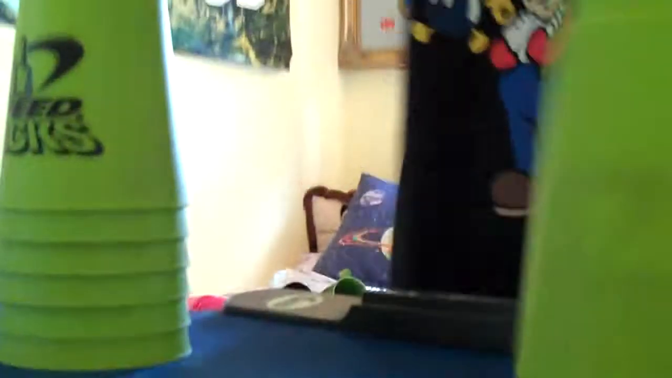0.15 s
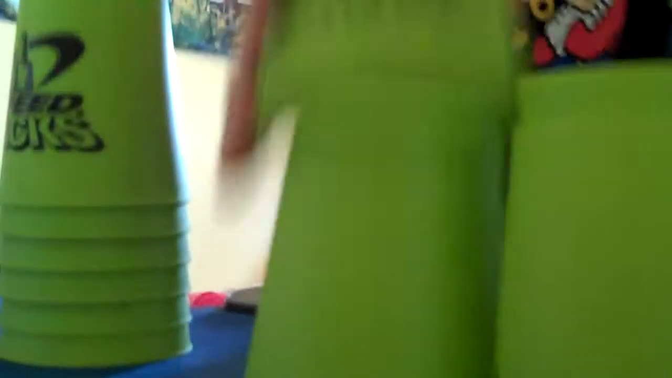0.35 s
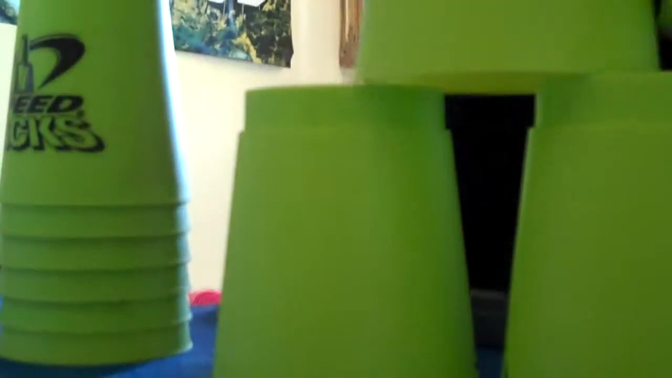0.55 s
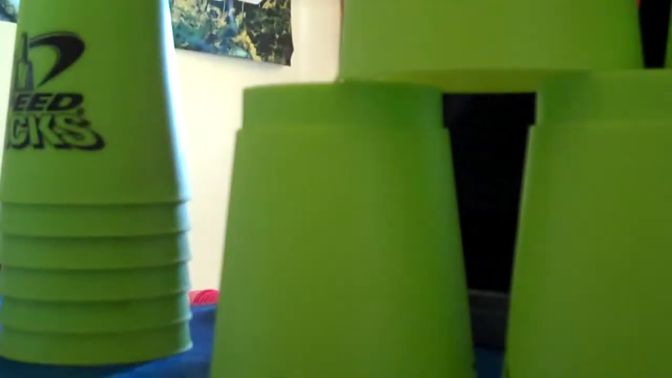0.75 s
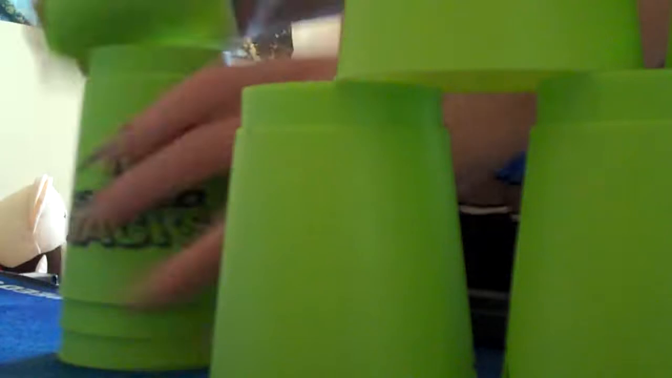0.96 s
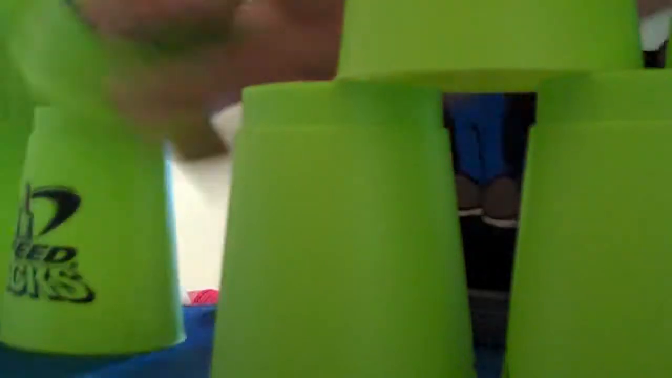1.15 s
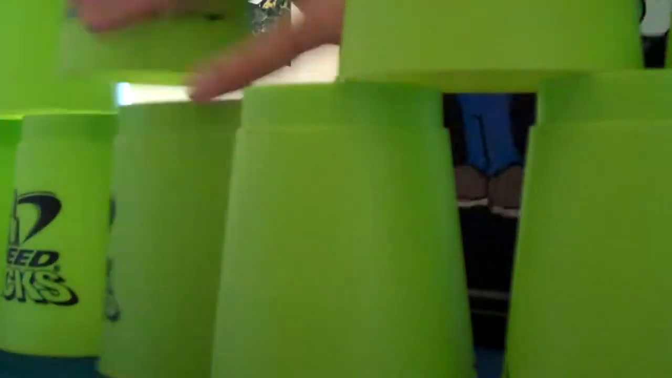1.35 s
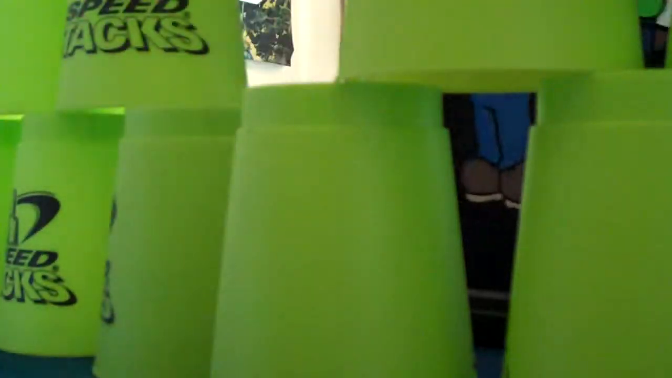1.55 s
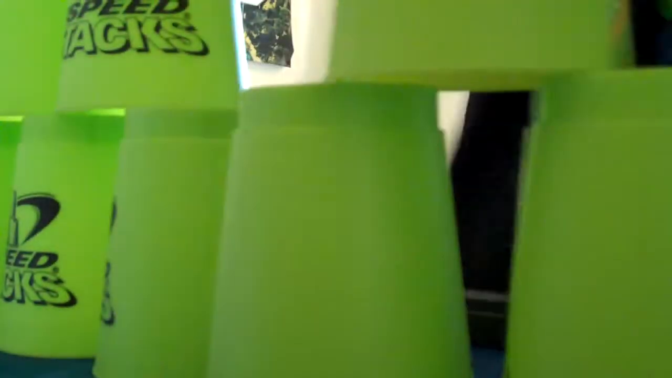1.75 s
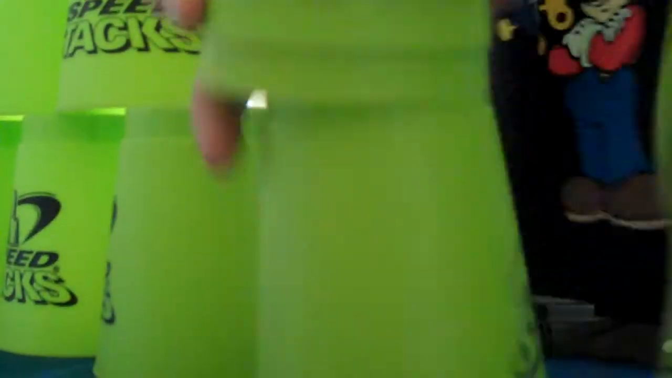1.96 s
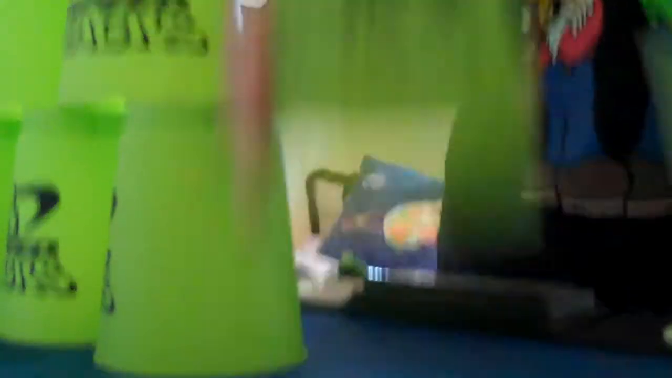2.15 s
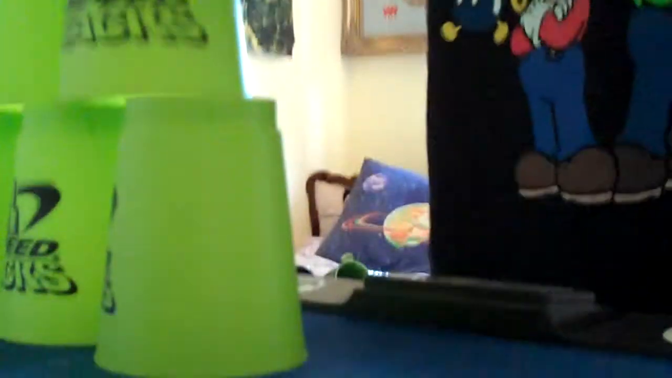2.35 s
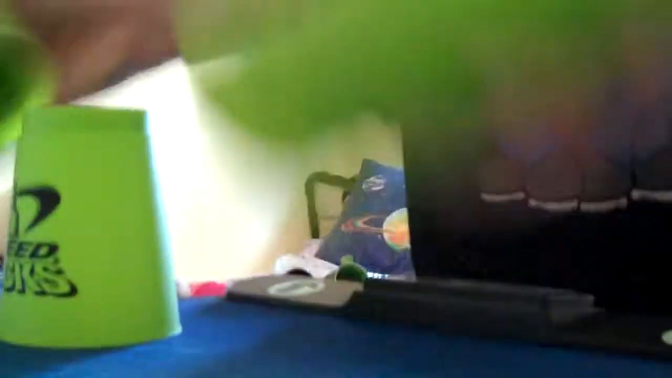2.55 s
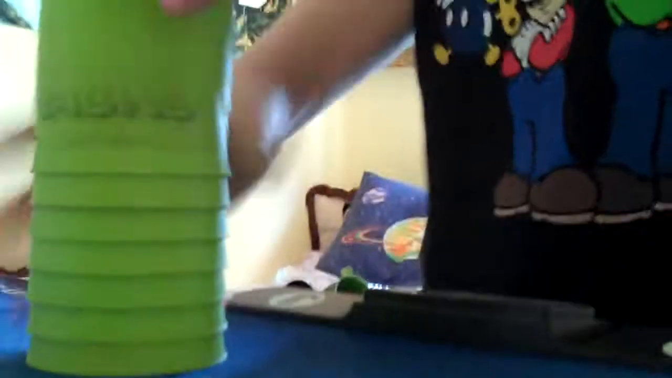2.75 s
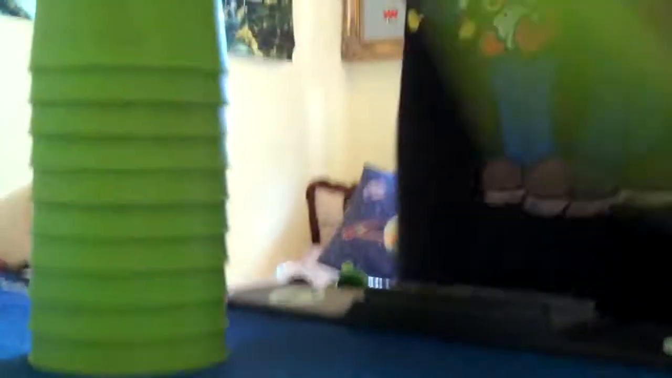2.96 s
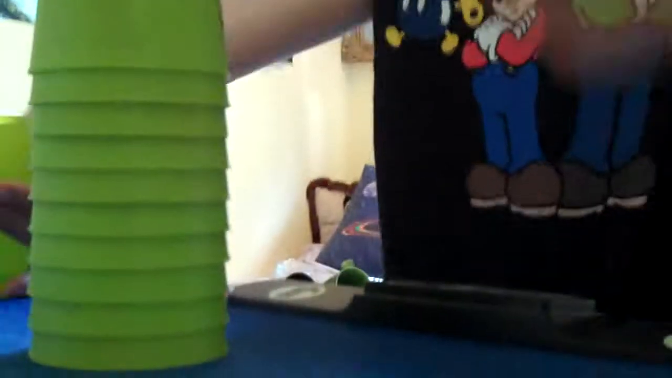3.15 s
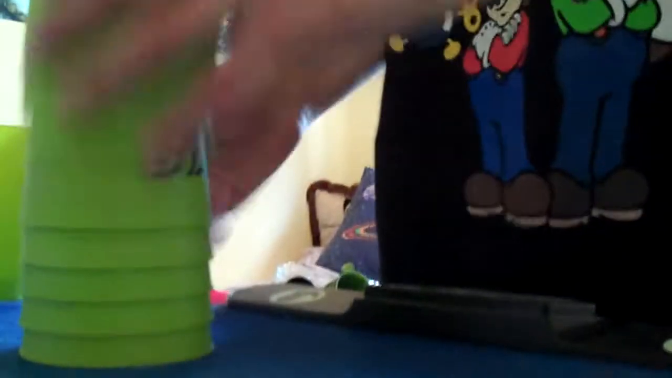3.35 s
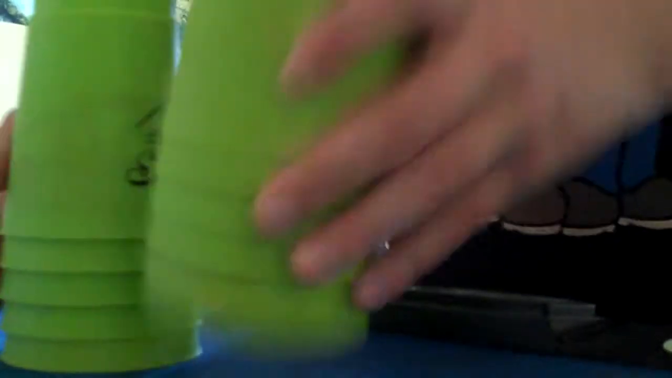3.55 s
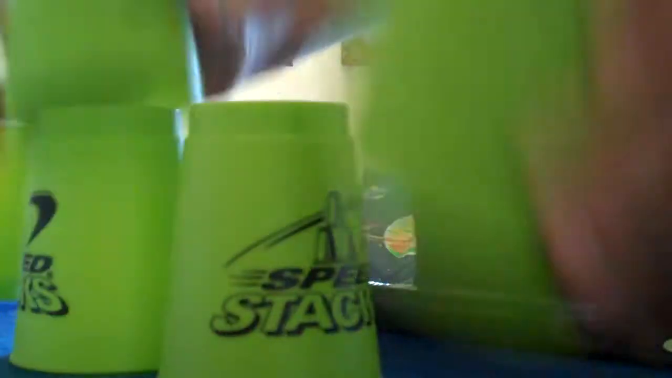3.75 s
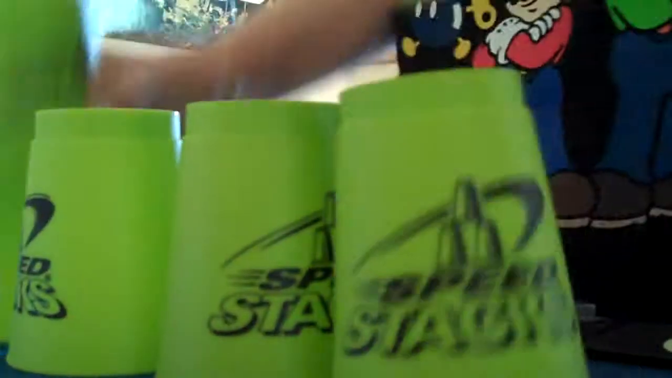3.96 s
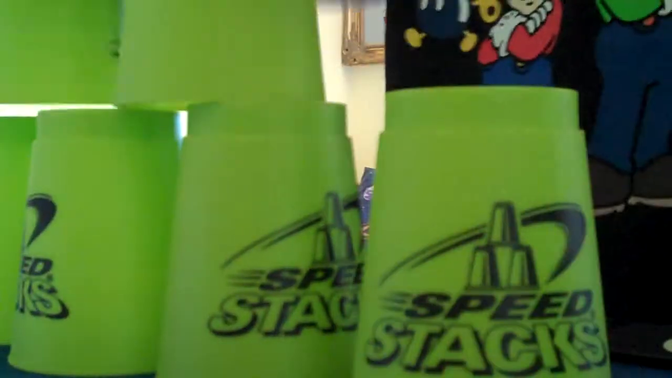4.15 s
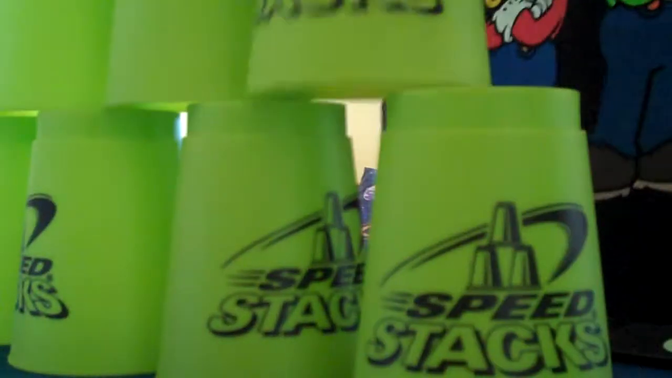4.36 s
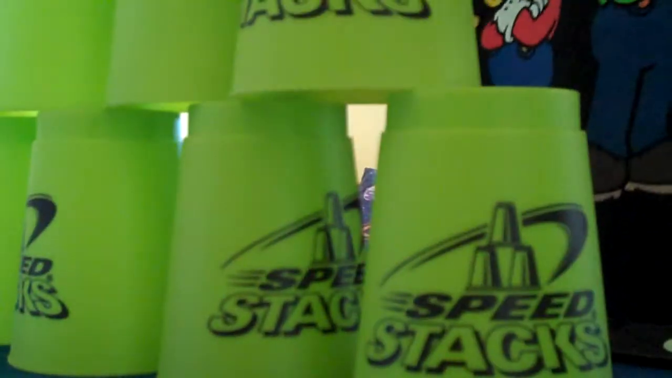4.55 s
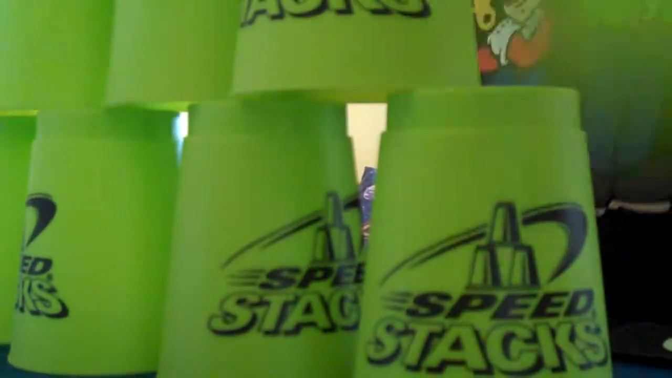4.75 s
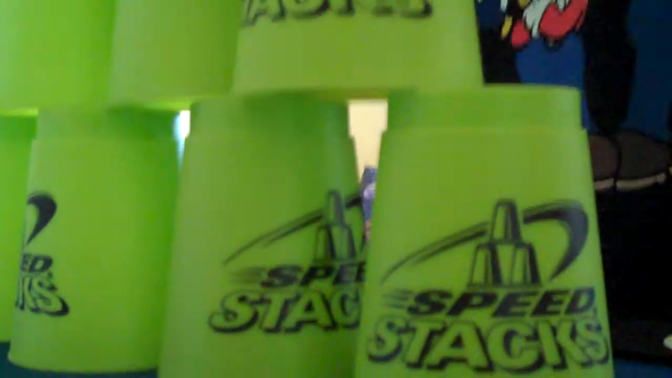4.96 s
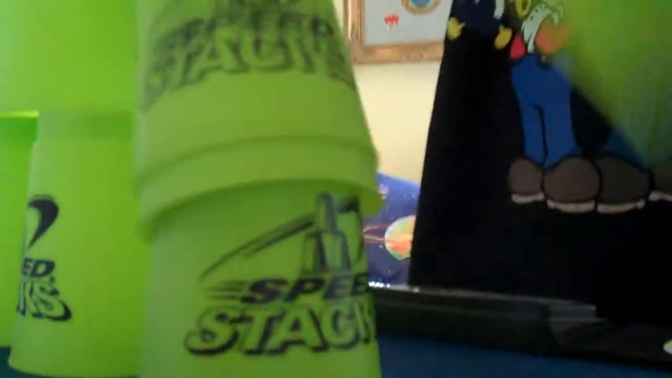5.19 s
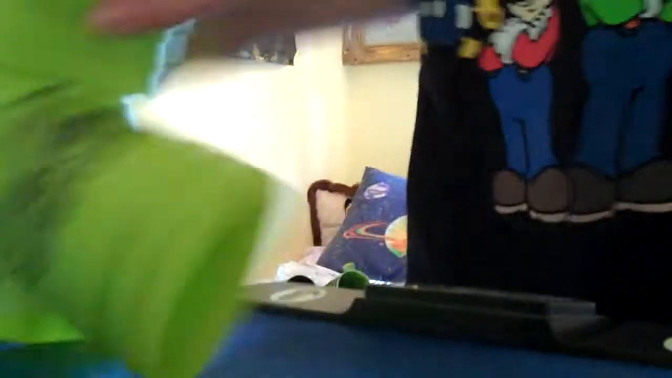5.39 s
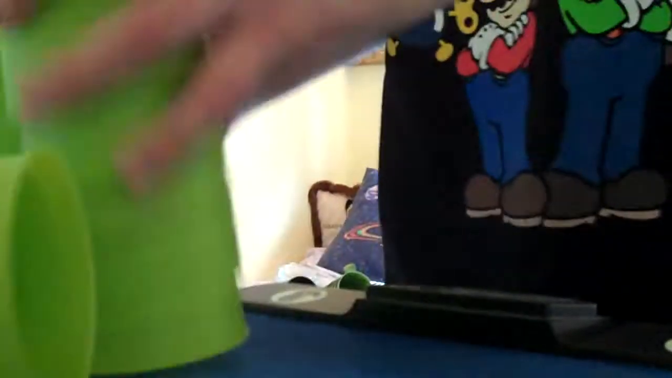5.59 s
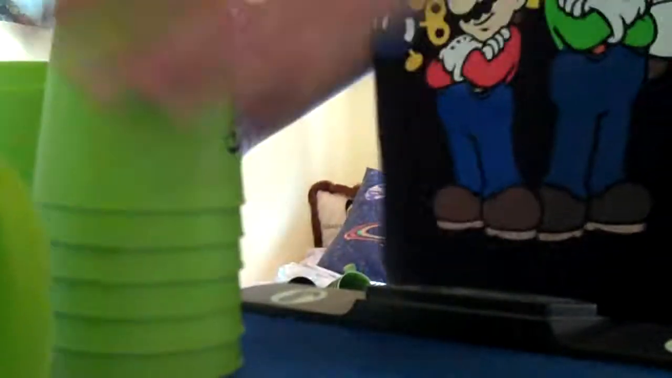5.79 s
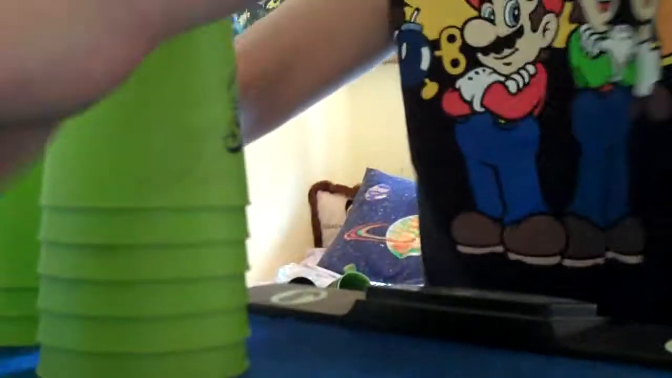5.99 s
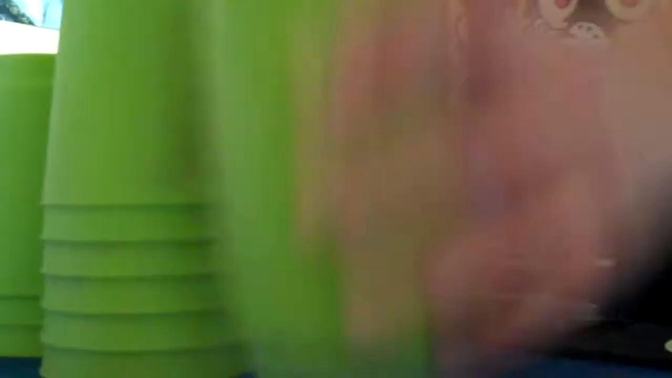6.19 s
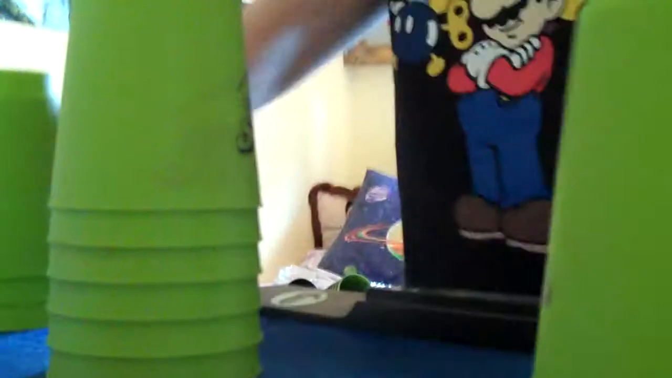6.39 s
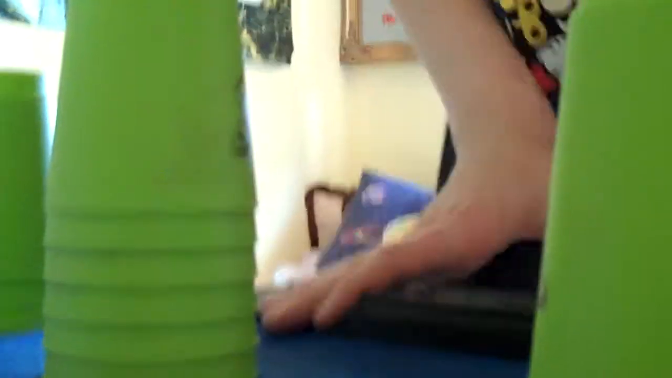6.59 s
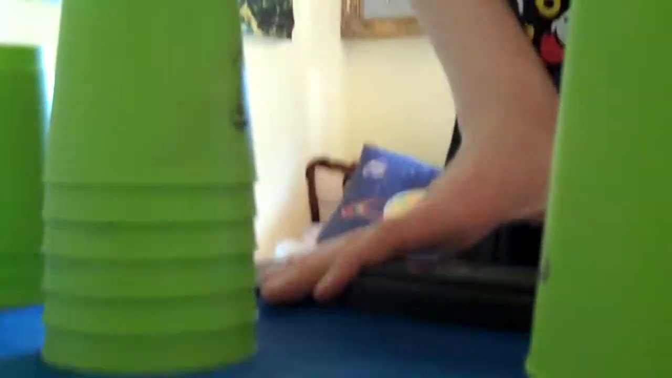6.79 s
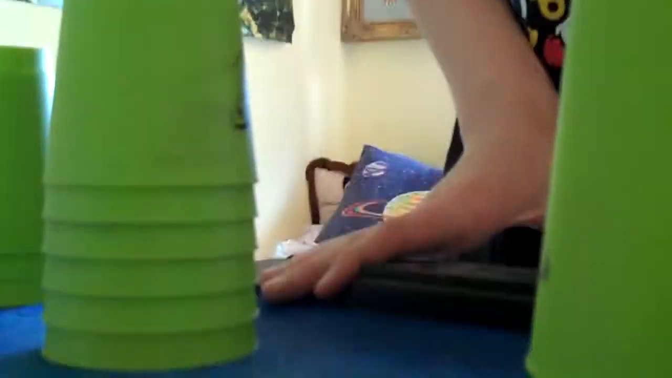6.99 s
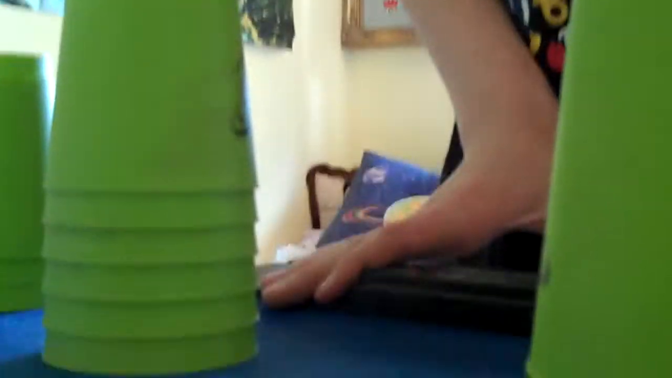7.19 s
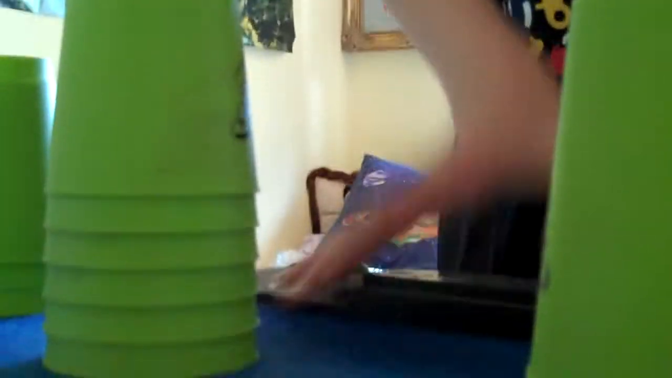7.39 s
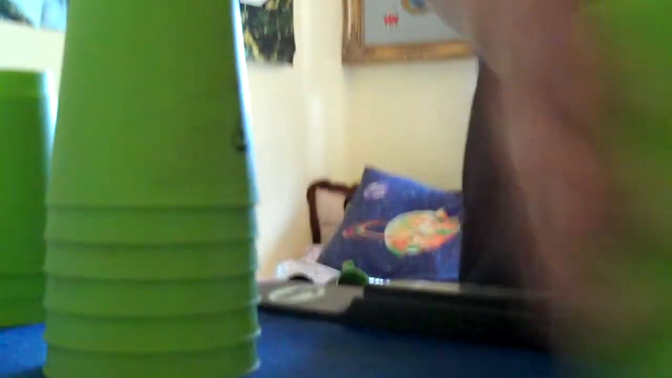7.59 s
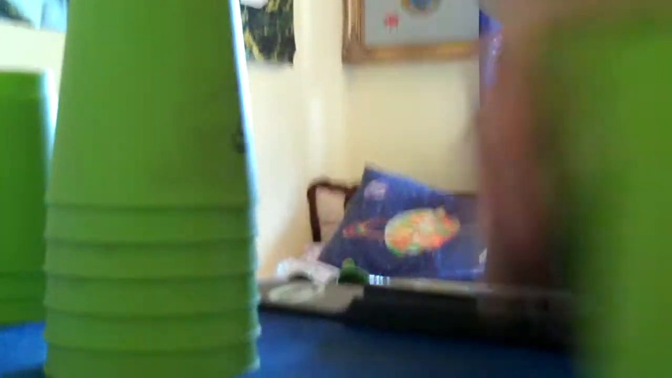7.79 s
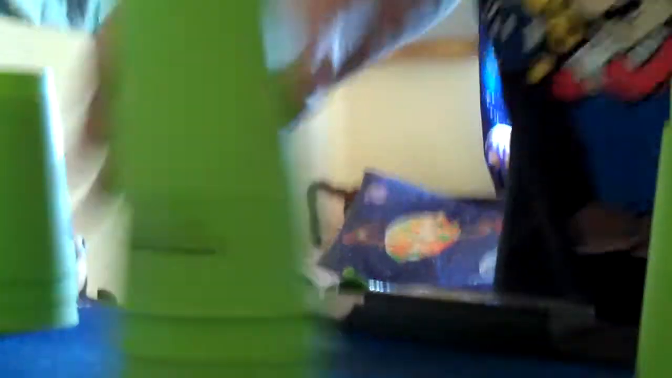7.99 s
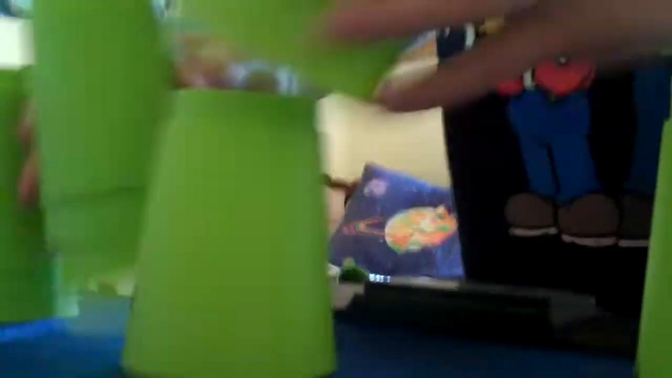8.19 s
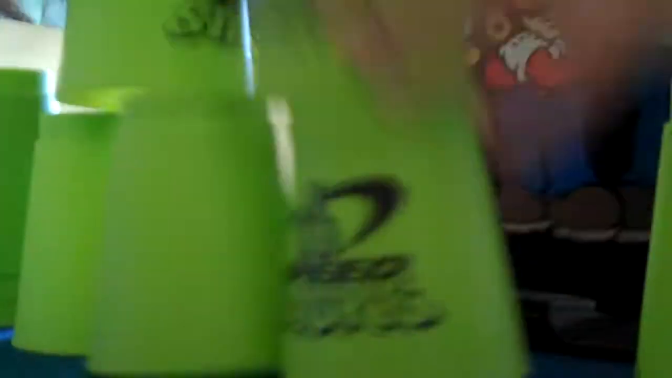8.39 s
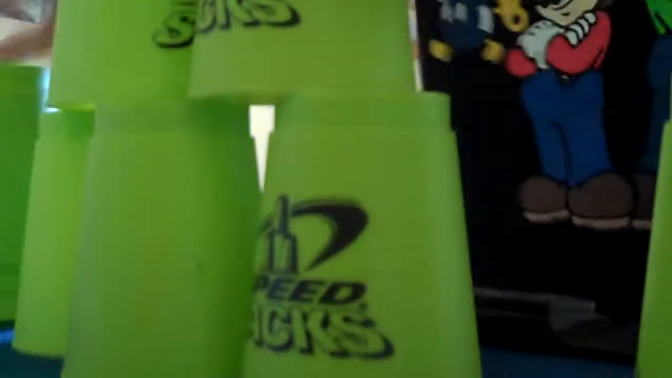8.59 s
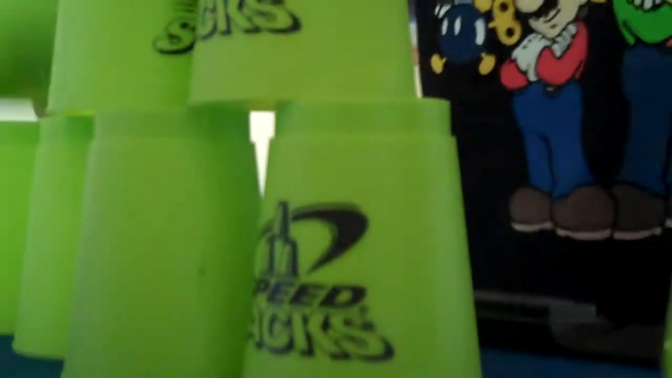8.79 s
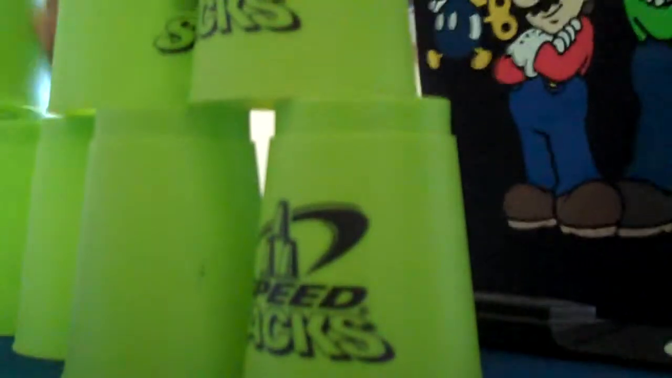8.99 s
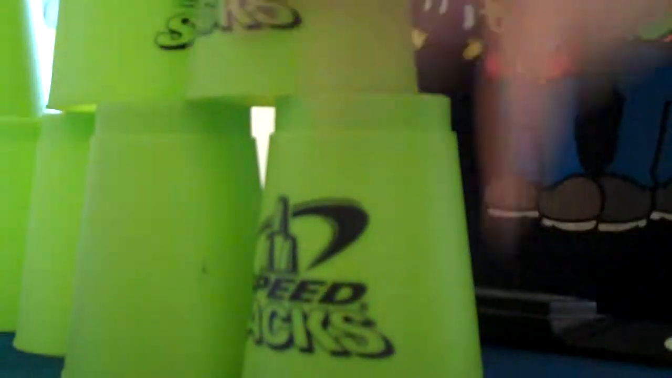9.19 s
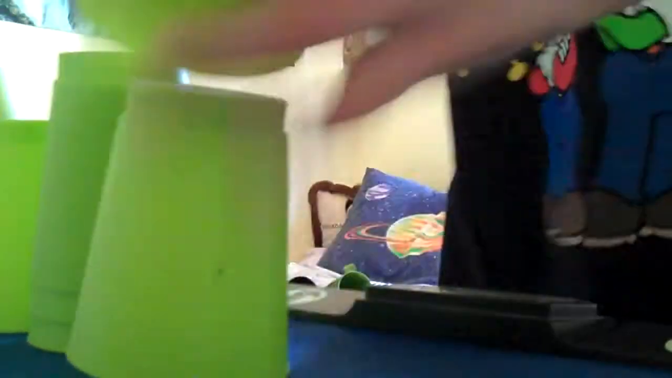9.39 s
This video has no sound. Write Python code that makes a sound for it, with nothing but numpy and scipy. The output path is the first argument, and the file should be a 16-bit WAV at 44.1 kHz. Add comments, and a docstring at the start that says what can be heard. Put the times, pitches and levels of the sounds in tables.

```python
"""Quick hollow tocks and hard clacks of light plastic cups, stacked up and swept down at speed.
They land on a padded mat, close to the microphone in a small room. Each contact rings damped modes
for the hollow of a cup, its thin wall, its hard rim and the table; noise bursts give the crack.
Nested cups rasp as clumps of stick-slip ticks, a few squeak upward, and low thumps sound under
some hits. Short echoes and a faint ringing of the room follow, over quiet rumble and hiss."""
import sys
import numpy as np
from scipy import signal
from scipy.fft import rfft, irfft
from scipy.io import wavfile

SR = 44100
rng = np.random.default_rng(int(sys.argv[2]) if len(sys.argv) > 2 else 0)


def wav_record(signal):
    """Record a signal, one row per channel, as 16-bit PCM in the file named by sys.argv[1]."""
    frames = np.transpose(np.atleast_2d(signal))
    bounded = np.clip(frames, -1, 1)
    # unit amplitude maps onto the largest positive 16-bit level
    quanta = np.round(bounded * 32767).astype(np.int16)
    wavfile.write(sys.argv[1], SR, quanta)


N = 416304

# cups and hands touching cups, mat and table:
# (t/s, hollow pitch f/Hz, hollow tock level/dB, clack pitch f/Hz, clack level/dB before its split)
CONTACTS = [(0.008, 764, -30, 1800, -33.5), (0.035, 875, -23, 1490, -33.5),
            (0.216, 800, -34.5, 2020, -36.5), (0.265, 630, -36.5, 2150, -62),
            (0.357, 607, -16, 2200, -21.5), (0.459, 880, -55.5, 5430, -41), (0.494, 756, -33.5, 1730, -36),
            (0.504, 765, -29, 2870, -27), (0.557, 573, -21.5, 5030, -33.5),
            (0.572, 800, -21.5, 1700, -34.5), (0.636, 860, -25.5, 1500, -36.5),
            (0.668, 760, -14, 1400, -20), (0.683, 870, -8.5, 1690, -22), (0.898, 716, -34.5, 1400, -44),
            (0.979, 704, -41, 1720, -46.5), (1.027, 710, -39.5, 1400, -45.5),
            (1.126, 860, -35, 5030, -26.5), (1.176, 687, -20.5, 1380, -32.5),
            (1.256, 570, -36.5, 2300, -53), (1.315, 650, -32.5, 2790, -36), (1.337, 610, -21, 1360, -31),
            (1.38, 760, -34, 4940, -42), (1.416, 740, -24.5, 1400, -42), (1.444, 895, -16, 3370, -30.5),
            (1.461, 916, -6, 2680, -21.5), (1.726, 790, -39, 1800, -64.5), (1.751, 940, -27.5, 1370, -48),
            (1.77, 865, -19.5, 4640, -52), (1.783, 830, -12, 1310, -19.5), (1.813, 960, -15.5, 2810, -21),
            (1.863, 784, -13, 1850, -16.5), (1.939, 700, -25, 2470, -26.5), (2.049, 560, -34, 1670, -26),
            (2.08, 605, -18, 1830, -27), (2.393, 760, -26.5, 6400, -38.5), (2.402, 840, -20, 4590, -37.5),
            (2.421, 740, -20, 2240, -32), (2.472, 800, -20, 1670, -26.5), (2.487, 760, -20.5, 2280, -28),
            (2.5, 810, -9.5, 1770, -16.5), (2.529, 700, -15.5, 1570, -24.5),
            (2.658, 614, -21.5, 2140, -35.5), (2.73, 638, -20, 1510, -30), (2.825, 680, -25, 2010, -34),
            (3.071, 673, -24.5, 1400, -44), (3.088, 628, -22.5, 2100, -52.5), (3.135, 597, -33, 1400, -54),
            (3.359, 664, -39, 2460, -44), (3.455, 676, -36, 1856, -53), (3.666, 550, -31.5, 2880, -36.5),
            (3.867, 635, -38, 1500, -51.5), (3.883, 583, -34, 5080, -39.5), (3.963, 624, -26, 1380, -40),
            (4.095, 574, -23, 1380, -35.5), (4.138, 830, -21, 1370, -29), (4.162, 830, -25.5, 2400, -45),
            (4.244, 744, -25.5, 1760, -43.5), (4.32, 710, -18, 1470, -27.5), (4.357, 890, -23, 5760, -35),
            (4.428, 844, -25.5, 1900, -47.5), (4.466, 880, -18, 2210, -32.5), (4.481, 913, -8, 2600, -21),
            (4.746, 505, -36.5, 2440, -48), (4.963, 800, -16.5, 3460, -27.5),
            (5.006, 850, -16, 3220, -28.5), (5.037, 634, -16.5, 5000, -31), (5.067, 640, -30, 4460, -27),
            (5.126, 730, -19, 2050, -25.5), (5.229, 624, -41, 3150, -45), (5.324, 720, -25.5, 4100, -34.5),
            (5.35, 855, -10.5, 1590, -36), (5.372, 720, -19.5, 2770, -35), (5.418, 750, -13, 1420, -27.5),
            (5.457, 776, -21.5, 1500, -39), (5.509, 890, -22, 1740, -26), (5.55, 545, -24.5, 1400, -47),
            (5.674, 647, -23, 1960, -37), (5.735, 650, -32, 1370, -45.5), (5.921, 690, -46, 1820, -61.5),
            (6.004, 940, -38, 1498, -48.5), (6.27, 750, -18.5, 1396, -25.5), (6.366, 980, -32, 1870, -34.5),
            (6.39, 650, -17.5, 1490, -20.5), (6.581, 914, -14.5, 1403, -18), (6.888, 878, -63, 1400, -73.5),
            (6.982, 570, -78, 2320, -63.5), (7.401, 683, -74.5, 2590, -52), (7.46, 710, -79.5, 3410, -58),
            (7.638, 650, -31.5, 2290, -29.5), (7.719, 920, -31, 2100, -24.5),
            (7.842, 650, -28.5, 2330, -29), (7.864, 880, -17.5, 1670, -21.5),
            (7.872, 960, -6.5, 2180, -13.5), (8.0, 690, -35, 5760, -44), (8.114, 786, -25, 1550, -25.5),
            (8.262, 713, -26.5, 1820, -34), (8.333, 620, -34.5, 1500, -50.5),
            (8.412, 676, -17.5, 2400, -31), (8.508, 870, -26.5, 3140, -42), (8.521, 895, -6.5, 2480, -20),
            (8.682, 546, -46, 2440, -56.5), (8.721, 576, -38, 1820, -49), (8.772, 806, -23.5, 1470, -36.5),
            (8.789, 865, -17.5, 7350, -35), (8.812, 750, -33.5, 2360, -24.5), (8.898, 920, -36, 1360, -42),
            (8.973, 554, -36, 6870, -46), (9.019, 510, -38.5, 2720, -45), (9.056, 734, -16.5, 1320, -30),
            (9.089, 880, -24.5, 1850, -31), (9.249, 900, -24, 5700, -35), (9.28, 790, -16, 3100, -22.5),
            (9.292, 800, -20, 6600, -27), (9.341, 826, -15, 3060, -17.5), (9.425, 840, -30, 1400, -35.5)]
# cups sliding over one another, before a cut of 6 dB common to all:
# (start t/s, end t/s, hollow level/dB, rasp level/dB)
SLIDES = [(0.25, 0.34, -46, -55), (0.51, 0.67, -42.5, -52.5), (0.875, 0.93, -45.5, -46),
          (1.04, 1.125, -48.5, -58.5), (1.715, 1.87, -26, -41.5), (1.87, 2.12, -31, -41.5),
          (2.24, 2.29, -64, -66.5), (2.4, 2.55, -21.5, -35), (2.67, 2.82, -36, -43.5),
          (2.87, 3.03, -54.5, -71.5), (3.37, 3.44, -50.5, -58.5), (3.52, 3.65, -59, -65),
          (3.76, 3.83, -47, -46.5), (3.89, 4.09, -48, -52), (4.2, 4.25, -42, -39.5),
          (4.27, 4.44, -24.5, -42.5), (4.957, 5.09, -16, -22.5), (5.33, 5.5, -29.5, -39),
          (5.52, 5.73, -35.5, -51.5), (6.16, 6.27, -55, -59), (7.41, 7.52, -70, -68.5),
          (7.65, 7.77, -39, -36), (8.01, 8.09, -55, -51.5), (8.16, 8.2, -67, -42), (8.36, 8.5, -27, -37),
          (8.6, 8.76, -54, -66), (8.78, 8.89, -36, -38.5), (8.98, 9.12, -47, -43), (9.26, 9.4, -26, -32.5)]
# low thumps under some of the hits, with a ring of the table:
# (t/s, thump peak level/dB before a common 6 dB lift, table ring level/dB)
THUMPS = [(0.356, -30, -37), (0.683, -34.5, -55.5), (1.458, -51.5, -39.5), (1.813, -38, -50),
          (1.86, -30, -40), (1.938, -35, -45), (2.501, -22, -23.5), (2.725, -46.5, -28.5),
          (4.482, -49.5, -42), (5.029, -52.5, -31), (6.389, -42.5, -25), (6.578, -56, -20.5),
          (7.87, -31, -29.5), (8.521, -21.5, -38), (8.811, -39.5, -46), (9.294, -34, -47),
          (9.339, -30, -32)]
# cups drawn off the stack: (t/s, length t/s, start f/Hz, end f/Hz, level/dB)
SQUEAKS = [(1.07, 0.024, 2700, 3230, -43.5), (3.745, 0.071, 2700, 3510, -44),
           (4.205, 0.055, 4970, 5830, -40.5)]
# air and body resonances of single and nested cups: (f/Hz, relative level/dB, t60/s)
HOLLOW_MODES = [(466, -6.5, 0.007), (519.4, 3, 0.046), (586.5, 1.5, 0.045), (665.6, -2, 0.067),
                (722.6, -4, 0.05), (801.3, -2.5, 0.086), (867.5, 2.5, 0.052), (962, -2, .045),
                (1054, 1, 0.037), (1127.6, -3, 0.083)]
# bending modes of the cup wall: (f/Hz, relative level/dB, t60/s)
WALL_MODES = [(1340, 1, .025), (1570, 3, .02), (1845, 5, .022), (2200, -1, .018), (2620, -4, .015),
              (3300, -3, .016)]
# ringing of the stiff rim: (f/Hz, relative level/dB, t60/s)
RIM_MODES = [(3359, -1, 0.01), (4003, -2, 0.018), (5240, 2, .016), (5970, -7, 0.035), (7870, -7, 0.0047),
             (11400, -20, .014)]
# modes of the table under the mat: (f/Hz, relative level/dB, t60/s)
TABLE_MODES = [(152, -10, 0.12), (211, -4.5, 0.19), (262, -2, 0.088), (300.7, -1, 0.18), (354, 3.5, 0.11),
               (395.3, 6.5, 0.1)]
# long faint ringing in the room: (f/Hz, resonator gain level/dB, t60/s)
AFTER_RING_MODES = [(245, -80, 3.1), (409, -78.5, 1), (750, -100.5, .9), (1000, -94, 1.3),
                    (985, -90.5, 0.76), (1056, -91, 0.42)]
# spectrum of the room background: (f/Hz, relative level/dB per Hz)
FLOOR_SPECTRUM = [(20, 6.5), (60, -9.5), (140, -10), (400, -5.5), (1000, -8.5), (1600, -14.5),
                  (3000, -18.5), (14000, -36)]

FLOOR_DB = -69.5
LEVEL_WINDOW_S = .01   # a blow's level is its energy spread over this window
CUTOFF_HZ = 14100
AGE = np.arange(SR // 4) / SR   # seconds since a contact
# a middling touch, against which the rules below are set
USUAL_TOCK_DB, USUAL_CLACK_DB, USUAL_PITCH_HZ, USUAL_CLACK_HZ = -22, -34.5, 810, 2200
# a hard or high-pitched clack comes more from the rim, less from the wall (gain in dB per dB)
WALL_SHARE_DB, RIM_SHARE_DB, RIM_GAIN_PER_DB, RIM_DB_PER_OCTAVE = -1.5, -6.5, 0.0848, 6.5
# the table knocks more under a heavier touch, and less under small, high-pitched piles
KNOCK_DB, KNOCK_PER_TOCK_DB, KNOCK_PER_CLACK_DB, KNOCK_DB_PER_OCTAVE = -41, 0.0671, 0.42, -8
KNOCK_MOST_DB = -1.5   # against the tock: a mere brush hardly moves the table
LEAD_S, LEAD_DB = .006, -16.5   # lead before the contact; level against the clack
SPOT_DB, SPOT_Q = -0.5, 5.7   # the struck spot favours a narrow group of modes
SLIDE_WALL_DB, SLIDE_RIM_DB = 0.5, -1   # shares of the rasp
SLIDE_TOP_HZ = 8000   # rubbing is duller than a snap
SQUEAK_WIDTH_HZ = 350


def from_db(db):
    """Turn decibels into an amplitude factor."""
    return 10 ** (np.asarray(db) / 20)


def rms_one(x):
    """Scale a sound to an rms of one."""
    return x / np.sqrt(np.mean(x ** 2) + 1e-20)


def at_level(x, db):
    """Scale a blow to the energy of one level window at the given rms."""
    return x * from_db(db) * np.sqrt(LEVEL_WINDOW_S * SR / (np.sum(x ** 2) + 1e-20))


def fade(t, t60):
    """Exponential decay, 60 dB down after t60 seconds."""
    return np.exp(-np.log(1000) * t / t60)


def cut(x, hz, kind, order=2):
    """Butterworth filter: low, high or band pass."""
    sections = signal.butter(order, hz, kind, fs=SR, output="sos")
    return signal.sosfilt(sections, x + 1e-18)


def add(track, s, sound):
    """Mix a sound into a track from time s."""
    start = max(round(s * SR), 0)
    part = sound[:max(len(track) - start, 0)]
    track[start:start + len(part)] += part


def background():
    """Faint rumble and hiss of the quiet room: noise shaped to the floor spectrum."""
    hz, db = np.transpose(FLOOR_SPECTRUM)
    bins_hz = np.maximum(np.arange(N // 2 + 1) * SR / N, 1)
    gain = from_db(np.interp(np.log(bins_hz), np.log(hz), db))
    noise = irfft(gain * rfft(rng.standard_normal(N)), N)
    return from_db(FLOOR_DB) * rms_one(noise)


def rebound(x, size_db=-11, spread_s=0.0039, count=3):
    """A light cup chatters: the envelope of a blow repeats, on the whole weaker, at uneven gaps."""
    out = x.copy()
    lags_s = np.cumsum(.001 + spread_s * rng.uniform(0.1, 1.8, count))
    for k, lag_s in enumerate(lags_s):
        db = size_db * np.sqrt(k + 1) + 2.0 * rng.standard_normal()
        add(out, lag_s, from_db(db) * x)
    return out


def crack(t60, rise_s, buzz_db=-20, buzz_t60=0.015):
    """Short noise bursts, new at every rebound, then a fine buzz dying away."""
    bursts = rebound((1 - np.exp(-AGE / rise_s)) ** 2 * fade(AGE, t60))
    buzz = from_db(buzz_db) * np.max(bursts) * fade(AGE, buzz_t60) * (1 - np.exp(-AGE / t60))
    noise, buzz_noise = rng.standard_normal((2, len(AGE)))
    return bursts * noise + buzz * buzz_noise * np.abs(buzz_noise)


def wall_colour(x):
    """The crowded bending modes of thin plastic, as a band of noise."""
    return cut(x, [1250, 3700], "band")


def rim_colour(x):
    """The bright sound of a hard edge, falling away towards the top."""
    return cut(cut(x, 3900, "high"), 5700, "low")


def lead_in(clack_db, spread_db=4):
    """A faint short noise in three bands leads into each contact."""
    force = crack(t60=0.048, rise_s=0.004)
    middle = rms_one(wall_colour(force))
    bright = from_db(-1) * rms_one(rim_colour(force))
    low = rms_one(cut(force, [450, 1100], "band"))
    level_db = clack_db + LEAD_DB + spread_db * rng.standard_normal()
    return at_level(middle + bright + low, level_db)


def struck(modes, spread_db, detune, centre_hz=None, octaves=.3):
    """Damped modes, strengths, signs and tuning new for each blow; those near any centre ring most."""
    hz, db, t60 = np.transpose(modes)[:, :, None]
    strength, shift, sign = rng.standard_normal((3, len(modes), 1))
    gain = from_db(db + spread_db * strength) * np.sign(sign)
    if centre_hz is not None:
        gain = gain / (1 + (np.log2(hz / centre_hz) / octaves) ** 2)
    tone = np.sin(2 * np.pi * hz * (1 + detune * shift) * AGE)
    return np.sum(gain * fade(AGE, t60) * tone, axis=0)


def table_knock():
    """The table rings briefly under the mat in a few low modes."""
    return cut(struck(TABLE_MODES, spread_db=4.5, detune=0.013), 120, "high")


def spot_colour(x, hz):
    """Each place on a cup has its own clack: a narrow resonance is added at its pitch."""
    b, a = signal.iirpeak(min(hz, SR / 4), SPOT_Q, fs=SR)
    return x + from_db(SPOT_DB) * signal.lfilter(b, a, x + 1e-18)


def touch_levels(pitch_hz, tock_db, clack_hz, clack_db):
    """Levels of hollow, table, wall and rim, from the weight, hardness and pitch of a touch."""
    weight_db, hardness_db = tock_db - USUAL_TOCK_DB, clack_db - USUAL_CLACK_DB
    knock_db = (KNOCK_DB + KNOCK_PER_TOCK_DB * weight_db + KNOCK_PER_CLACK_DB * hardness_db
                + KNOCK_DB_PER_OCTAVE * np.log2(pitch_hz / USUAL_PITCH_HZ))
    knock_db = min(knock_db, tock_db + KNOCK_MOST_DB)
    clack_octaves = np.log2(clack_hz / USUAL_CLACK_HZ)
    tilt_db = (RIM_GAIN_PER_DB * hardness_db + RIM_DB_PER_OCTAVE * clack_octaves) / 2
    return tock_db, knock_db, clack_db + WALL_SHARE_DB - tilt_db, clack_db + RIM_SHARE_DB + tilt_db


def contact(pitch_hz, clack_hz, hollow_db, knock_db, wall_db, rim_db, seat_s=0.0013):
    """One touch: hollow tock, knock of the table, clack of the wall and snap of the rim."""
    hollow = struck(HOLLOW_MODES, spread_db=2.0, detune=0.038, centre_hz=pitch_hz, octaves=0.43)
    hollow = cut(hollow, [330, 1700], "band")
    force = crack(t60=0.01, rise_s=0.0007)
    seating = 1 - np.exp(-AGE / seat_s)   # the flexible rim takes a moment to meet all round
    wall_ring = struck(WALL_MODES, spread_db=4.5, detune=.08, centre_hz=clack_hz, octaves=.6)
    wall = rms_one(wall_colour(force)) + rms_one(seating * wall_ring)
    rim_ring = struck(RIM_MODES, spread_db=4, detune=.08)
    rim = rms_one(rim_colour(force)) + from_db(-7) * rms_one(seating * rim_ring)
    clack = spot_colour(at_level(wall, wall_db) + at_level(rim, rim_db), clack_hz)
    return at_level(hollow, hollow_db) + at_level(table_knock(), knock_db) + clack


def room(x, wet_db=-8, echo_db=-11, late_db=-31, late_t60=0.95, gap_s=0.0032):
    """Near surfaces send back a quick flurry of echoes; then a short diffuse tail, lows lasting longest."""
    t = np.arange(SR * 3 // 5) / SR
    noise = rng.standard_normal((4, len(t)))
    arrived = np.clip(t / gap_s - 1, 0, 1)   # silence before the first reflection
    tail = (cut(noise[0], 1100, "low") + cut(noise[1], 2000, "high")) * fade(t, 0.18) * arrived
    echoes = noise[2] ** 3 * fade(t, 0.085) * arrived   # cubing leaves a few strong echoes
    late = noise[3] * fade(t, late_t60) * arrived
    tail, echoes, late = [rms_one(part) / np.sqrt(len(t)) for part in (tail, echoes, late)]
    early = cut(from_db(wet_db) * tail + from_db(echo_db) * echoes, 10000, "low", order=1)
    response = early + from_db(late_db) * cut(late, 1600, "low")
    return signal.fftconvolve(x, response)[:N]


def after_ring(x):
    """Lightly damped resonances answer the clatter in sympathy."""
    out = np.zeros(N)
    for hz, db, t60 in AFTER_RING_MODES:
        r, w = fade(1 / SR, t60), 2 * np.pi * hz / SR   # pole radius and angle
        ring = signal.lfilter([0, np.sin(w)], [1, -2 * r * np.cos(w), r * r], x + 1e-18)
        out += from_db(db) * ring
    return out


def surge(n, per_s, db):
    """A gain that wanders as the pressure between the cups changes."""
    knots = rng.standard_normal(200)
    return from_db(db * np.interp(np.arange(n) * per_s / SR, np.arange(len(knots)), knots))


def pile_pitch(s):
    """Sliding cups ring near the pitches of the contacts around that time."""
    times, pitches = np.transpose(CONTACTS)[:2]
    return np.interp(s, times, pitches)


def jostle(force, start):
    """The ticks of a slide pass from cup to cup, so the hollow keeps changing its ring."""
    step = SR // 40
    out = np.zeros(len(force) + SR // 10)
    for i in range(0, len(force), step):
        pitch_hz = pile_pitch(start + i / SR)
        ring = struck(HOLLOW_MODES, spread_db=2.5, detune=0.035, centre_hz=pitch_hz, octaves=0.8)
        add(out, i / SR, signal.fftconvolve(force[i:i + step], rms_one(ring)))
    return out


def slide(start, length_s, hollow_db, wall_db, rim_db, slips_per_s=900, slip_spread_db=3):
    """Sticking and slipping: clumps of uneven ticks over a fine hiss, which also sound the hollow."""
    n = max(round(length_s * SR), SR // 100)
    slips = rng.random(n) < slips_per_s / SR
    size, snag, grain = rng.standard_normal((3, n))
    stroke = np.sin(np.pi * (np.arange(n) + .5) / n) ** 0.64 * surge(n, per_s=130, db=7.0)
    ticks = stroke * (slips * size * from_db(slip_spread_db * snag) + .1 * grain)
    force = np.pad(ticks, (0, SR // 10))
    # the line of contact travels along the wall, so each pitch region swells in its own time
    rasp = np.zeros(len(force))
    edges_hz = np.geomspace(900, 15000, 9)
    for low, high in zip(edges_hz, edges_hz[1:]):
        rasp += cut(force, [low, high], "band", order=1) * surge(len(force), per_s=40, db=3.0)
    hollow = at_level(cut(jostle(ticks, start), 380, "high"), hollow_db)
    wall = at_level(wall_colour(rasp), wall_db)
    rim = at_level(cut(rim_colour(rasp), SLIDE_TOP_HZ, "low", order=1), rim_db)
    # spread the level over the whole slide, with the common 6 dB cut
    return from_db(-6.0) * np.sqrt(length_s / LEVEL_WINDOW_S) * (hollow + wall + rim)


def thumps(rise_s=0.0019, t60=0.0044, gain_db=6):
    """One short low pulse under some of the hits."""
    pulse = cut((1 - np.exp(-AGE / rise_s)) * fade(AGE, t60), 30, "high", order=1)
    out = np.zeros(N)
    for s, db, _ in THUMPS:
        add(out, s, from_db(db + gain_db) * pulse / np.max(np.abs(pulse)))
    return out


def squeak(length_s, start_hz, end_hz, width_hz, db):
    """A cup drawn off the stack zips upward in pitch, its strength wobbling at random."""
    u = np.linspace(0, 1, round(length_s * SR))
    wobble = rms_one(cut(rng.standard_normal(N), width_hz, "low"))[-len(u):]
    phase = 2 * np.pi * np.cumsum(start_hz + (end_hz - start_hz) * u) / SR
    return from_db(db) * np.sin(np.pi * u) * wobble * np.sin(phase)


def cups(count=10):
    """The cups land on several spots of the mat, dealt in turn to one track for each spot."""
    spots = np.zeros((count, N))
    for k, (s, pitch_hz, tock_db, clack_hz, clack_db) in enumerate(CONTACTS):
        levels = touch_levels(pitch_hz, tock_db, clack_hz, clack_db)
        add(spots[k % count], s - LEAD_S, lead_in(clack_db))
        add(spots[k % count], s, contact(pitch_hz, clack_hz, *levels))
    for k, (start, end, hollow_db, rasp_db) in enumerate(SLIDES):
        rub = slide(start, end - start, hollow_db, rasp_db + SLIDE_WALL_DB, rasp_db + SLIDE_RIM_DB)
        add(spots[k % count], start, rub)
    for k, (s, _, ring_db) in enumerate(THUMPS):
        add(spots[k % count], s, at_level(table_knock(), ring_db))
    for k, (s, length_s, start_hz, end_hz, db) in enumerate(SQUEAKS):
        add(spots[k % count], s, squeak(length_s, start_hz, end_hz, SQUEAK_WIDTH_HZ, db))
    return spots


def scene():
    """Direct clatter, separate echoes for every spot, after-ring, thumps and the quiet room."""
    spots = cups()
    echoes = sum(room(spot) for spot in spots)
    clatter = spots.sum(axis=0) + echoes
    return (clatter + after_ring(clatter) + thumps() + background())[None]


def record(dry, top=0.81):
    """The loudest peaks overload the microphone and are rounded off; the top of the treble is cut."""
    rounded = dry / (1 + (dry / top) ** 4) ** (1 / 4)
    low_pass = signal.ellip(10, .2, 70, CUTOFF_HZ, fs=SR, output="sos")
    return signal.sosfilt(low_pass, rounded)


dry = scene()
out = record(dry)
wav_record(out)
```